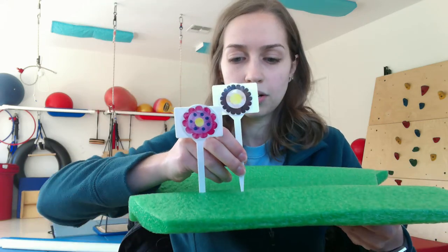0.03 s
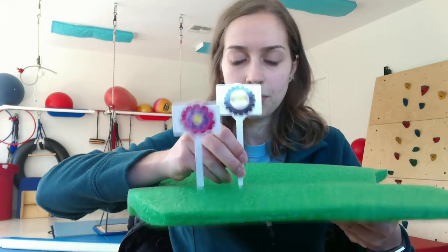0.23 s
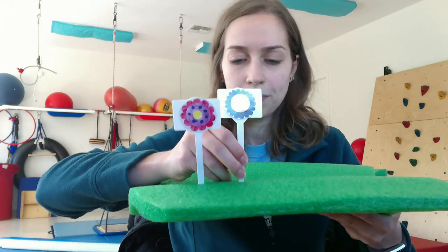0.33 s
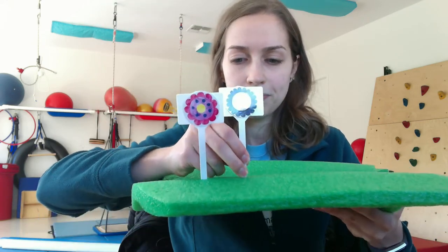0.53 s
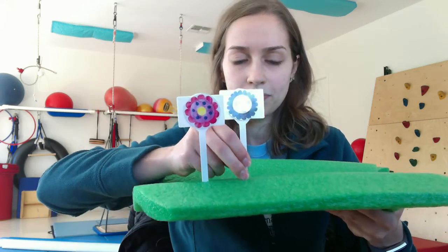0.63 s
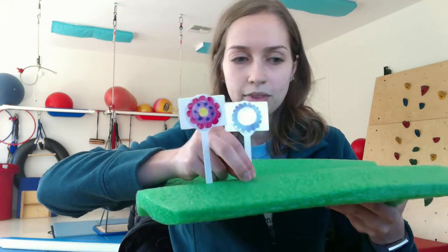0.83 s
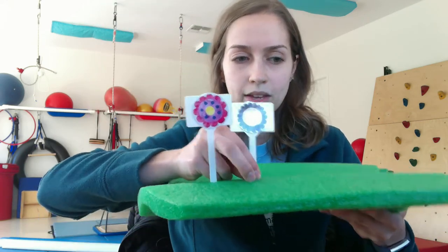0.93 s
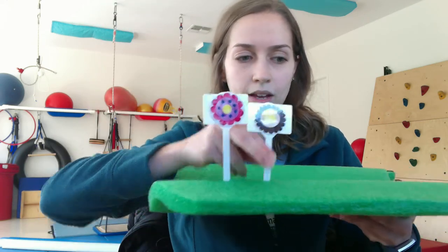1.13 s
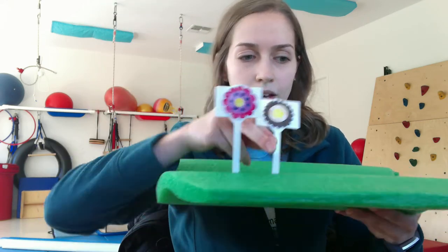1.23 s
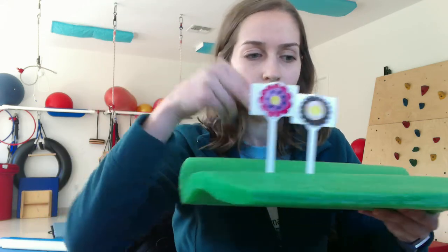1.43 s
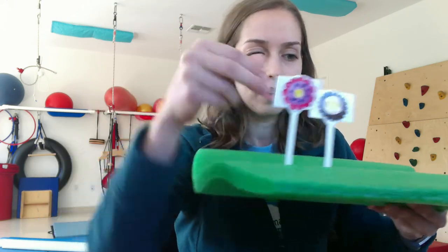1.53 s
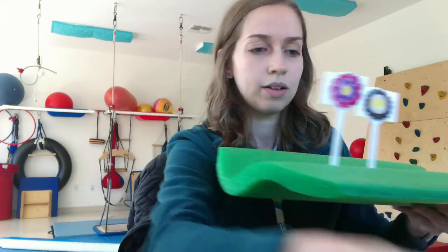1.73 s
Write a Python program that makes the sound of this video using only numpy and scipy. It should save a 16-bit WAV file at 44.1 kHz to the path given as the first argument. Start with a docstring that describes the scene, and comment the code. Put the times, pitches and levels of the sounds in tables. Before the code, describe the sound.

A plastic stem snaps into a foam pad with one loud, sharp crack in an echoing room

```python
"""A large, quiet, echoing room: a plastic stem snaps into a foam pad held close to the microphones.
One loud crack, a noise burst over ringing modes, sets off reflections and a hall tail.
A soft knock on the pad's modes, small ticks of filtered noise, a rustle of fingers on foam made of
random grains and a faint tone join it, over shaped-noise hiss and rumble and a wavering mains hum."""
import sys
import numpy as np
from scipy import signal
from scipy.fft import irfft
from scipy.io import wavfile
from scipy.ndimage import uniform_filter1d

SR = 44100
rng = np.random.default_rng(int(sys.argv[2]) if len(sys.argv) > 2 else 0)


def natural_amplitude(level_db):
    """Convert a level in decibels to a linear amplitude factor, elementwise."""
    exponent = np.asarray(level_db, float) / 20
    return 10 ** exponent


def unload_wav(signal):
    """Save mono or channel-first audio to the path in sys.argv[1] as 16-bit WAV at rate SR, clipped to [-1, 1]."""
    wavfile.write(
        sys.argv[1],
        SR,
        np.round(np.clip(np.atleast_2d(signal).T, -1, 1) * 32767).astype(np.int16),
    )


N = 79380


def evened(x):
    """Scales to an rms of 1."""
    return x / np.sqrt(np.mean(x ** 2) + 1e-20)


def read(points, hz, column=1):
    """Interpolates a table column over log frequency."""
    table = np.array(points)
    return np.interp(np.log(hz + 1), np.log(table[:, 0] + 1), table[:, column])


def add(mix, start_s, sound):
    """Adds a sound in place, cut at the end of the mix."""
    part = mix[..., round(start_s * SR):][..., :sound.shape[-1]]
    part += sound[..., :part.shape[-1]]


def sides(left_right_db):
    """Left and right gains, split evenly about 0 dB."""
    return natural_amplitude(np.array([[left_right_db / 2], [-left_right_db / 2]]))


def coloured(x, points):
    """Minimum-phase filter with the given spectrum, energy 1."""
    hz = abs(np.fft.fftfreq(4096, 1 / SR))
    log_gain = np.log(natural_amplitude(np.maximum(read(points, hz), -70)))
    spectrum = np.exp(np.conj(signal.hilbert(log_gain)))
    taps = np.fft.ifft(spectrum).real[:2048]
    return signal.fftconvolve(x, (taps / np.linalg.norm(taps))[None], axes=1)


def noise_pair(size, gain=1):
    """Two-channel noise, alike in the bass as two close microphones are."""
    # Each row: frequency in Hz, left-right correlation (-1 to 1).
    likeness = [(60, 0.86), (150, 0.78), (380, 0.76), (950, 0.92), (2380, 0.53), (5980, 0.45),
                (15000, -0.1)]
    a, b, c, d = rng.standard_normal((4, size // 2 + 1))
    same = np.clip(read(likeness, np.fft.rfftfreq(size, 1 / SR)), -1, 1)
    left = a + 1j * b
    right = same * left + np.sqrt(1 - same ** 2) * (c + 1j * d)
    return evened(irfft(np.array([left, right]) * gain, size))


def burst(t60_s):
    """Noise under an exponential decay."""
    return noise_pair(size=4096) * natural_amplitude(-60 * np.arange(4096) / SR / t60_s)


def snap(t60_s):
    """One click followed by a decaying scatter of noise."""
    out = burst(t60_s)
    out[:, 0] = natural_amplitude(12)  # dB over the scatter's initial rms
    return out


def ring(hz, db, t60_s, rise_s):
    """One mode: a decaying sine with a soft start."""
    t = np.arange(SR // 2) / SR
    return natural_amplitude(db - 60 * t / t60_s) * (1 - np.exp(-t / rise_s)) * np.sin(2 * np.pi * hz * t)


def echoed(x, late_db):
    """The sound itself and a few smeared echoes off near surfaces."""
    # Each row: delay in seconds, level in dB (late_db is added past 5 ms), smear T60 in seconds.
    echoes = [(.002, -7, .004), (.0035, -11, .008), (.0105, -11, .04), (.0372, -17, .02)]
    taps = np.zeros((2, 8192))
    taps[:, 0] = 1
    for delay_s, db, t60_s in echoes:
        smear = burst(t60_s)
        smear = smear / np.linalg.norm(smear, axis=1, keepdims=True)
        add(taps, delay_s, natural_amplitude(db + late_db * (delay_s > .005)) * smear)
    return signal.fftconvolve(x, taps, axes=1)[:, :N]


def room(x, near_db, hall_db):
    """A quick cluster of reflections, then the long tail dying band by band."""
    # Each row: frequency in Hz, T60 in seconds, relative level in dB.
    hall_bands = [(50, 1.6, 1), (80, 1.0, 3.5), (160, 0.36, 3.5), (257, 0.77, 3.5), (390, 0.83, -4.5),
                  (600, 0.93, 0.5), (1224, 0.88, 3.5), (2496, 1.1, -3.5), (4070, 1.046, -0.5),
                  (5500, .9, -3.5), (7000, 0.7, 3.5), (8920, .6, 0.5), (12000, 0.6, -6.5),
                  (16000, 0.49, -2.5)]
    near_t60_s, near_start_s, hall_rise_s = 0.18, 0.0013, 0.01
    t = np.arange(SR) / SR
    near = noise_pair(SR) * natural_amplitude(-60 * t / near_t60_s) * (t > near_start_s)
    hz, frame_s, z = signal.stft(noise_pair(SR), SR, nperseg=1024, noverlap=768)
    band_db = read(hall_bands, hz, column=2)[:, None]
    band_t60_s = read(hall_bands, hz)[:, None]
    z = z * natural_amplitude(band_db - 60 * frame_s / band_t60_s)
    hall = signal.istft(z, SR, nperseg=1024, noverlap=768)[1][:, :SR]
    hall = hall * (1 - np.exp(-t / hall_rise_s))
    taps = natural_amplitude(near_db) * near / np.linalg.norm(near[0]) + natural_amplitude(hall_db) * hall / np.linalg.norm(hall[0])
    return signal.fftconvolve(x, taps, axes=1)[:, :N]


def background():
    """Rumble and hiss as shaped noise, and a mains hum whose level wavers at random."""
    # Each row: frequency in Hz, relative level in dB per Hz.
    floor_colour = [(12, -0.5), (22, -1), (33, -7), (50, -7.5), (80, -19.5), (130, -20), (170, -28.5),
                    (280, -25.5), (490, -32.5), (800, -36.5), (1400, -41), (3000, -45.5), (7500, -46.5),
                    (12000, -44), (15000, -44), (16500, -49.5)]
    # Each row: frequency in Hz, left over right in dB.
    floor_balance = [(60, -2.5), (240, 0), (950, -0.5), (3770, 2), (15000, -1.5)]
    floor_db, hum_hz, hum_rms_db, waver_rms = -47, 118.3, -56.5, 0.067
    hz, t = np.fft.rfftfreq(N, 1 / SR), np.arange(N) / SR
    side_db = np.outer([.5, -.5], read(floor_balance, hz))
    floor = noise_pair(N, natural_amplitude(read(floor_colour, hz) + side_db))
    waver = evened(uniform_filter1d(rng.standard_normal(N), 3000))
    hum = np.sqrt(2) * (1 + waver_rms * waver) * np.sin(2 * np.pi * hum_hz * t)
    return natural_amplitude(floor_db) * floor + natural_amplitude(hum_rms_db) * hum


def ticks():
    """Plastic on foam: bright click, middle snap, duller tap; returns the ticks and what drives the room."""
    # Each row: start in seconds, treble, middle and body levels in dB, left over right in dB,
    # T60 in seconds.
    tick_rows = [(.189, -53.5, -80, -71, 1, 0.0034), (.2077, -50, -72, -67, 7, 0.0045),
                 (.465, -44, -47, -76, 3, 0.0041), (0.674, -40.5, -41.5, -39.5, 10.5, 0.016),
                 (.783, -48.5, -73, -75, 16, 0.0033), (0.7888, -46, -70, -48, 11, .005),
                 (0.796, -79, -68, -37, 6, 0.0047), (0.799, -40, -61, -47, 14, 0.0047),
                 (0.8015, -30, -34, -31, 9, 0.018), (0.9176, -48.5, -64, -59, 9, 0.0034),
                 (1.017, -54, -72, -69.5, 10, 0.0074), (1.1075, -51.5, -71, -78, 0, 0.0045),
                 (1.3184, -34, -46, -58, 15.5, 0.0057), (1.4973, -24, -30, -48, 11, 0.005)]
    # Spectra of the three layers. Each row: frequency in Hz, relative level in dB per Hz.
    treble_colour = [(4500, -36), (6500, -19.5), (8200, -1.5), (9500, 0), (11000, -3), (13000, -6),
                     (16500, -9)]
    middle_colour = [(1200, -32), (2200, -8.5), (3200, -3), (4500, -6.5), (6000, -5.5), (8000, -1.5),
                     (11000, -18)]
    body_colour = [(200, -21.5), (600, -12), (1100, -4.5), (1550, 0), (2100, -13), (3500, -37)]
    direct, impulses = np.zeros((2, 3, 2, N))
    for start_s, *levels_db, left_right_db, t60_s in tick_rows:
        for k, db in enumerate(levels_db):
            add(direct[k], start_s, natural_amplitude(db) * sides(left_right_db) * snap(t60_s))
            add(impulses[k], start_s, natural_amplitude(db) * np.ones((1, 1)))
    colours = treble_colour, middle_colour, body_colour

    def joined(layers):
        return sum(coloured(x, colour)[:, :N] for x, colour in zip(layers, colours))

    return joined(direct), joined(impulses)


def crack():
    """The stem snaps through: a wide burst and the ring of stem and pad; the room answers the snap."""
    # Each row: frequency in Hz, relative level in dB per Hz.
    crack_colour = [(40, -2.5), (80, -2.5), (160, -13), (260, 0), (380, -3.5), (520, 3.5), (750, -3),
                    (1050, -5.5), (1500, 0.5), (2100, -2.5), (2800, 0), (4200, 1), (5200, 2), (6500, -6),
                    (8000, -9), (12000, -7.5), (15500, -9.5), (17000, -29.5)]
    # Each row: frequency in Hz, relative level in dB, T60 in seconds.
    crack_modes = [(56, -9.5, 0.35), (78, -0.5, 0.12), (256, -5, 0.13), (518, -1.5, .11), (606, -4.5, 0.16),
                   (1348, -3.5, .07), (1859, 0, 0.082), (2780, -12, 0.052)]
    start_s, t60_s, left_right_db = .2436, 0.013, 5.5
    snap_db, ring_db = -7, -25
    direct, click, rung = np.zeros((3, 2, N))
    add(direct, start_s, natural_amplitude(snap_db) * sides(left_right_db) * coloured(snap(t60_s), crack_colour))
    add(click, start_s, natural_amplitude(snap_db) * coloured(np.ones((1, 1)), crack_colour))
    modes = sum(ring(*mode, rise_s=.003) for mode in crack_modes)
    add(rung, start_s, natural_amplitude(ring_db) * sides(left_right_db) * modes)
    return echoed(direct, late_db=0) + rung + room(click, near_db=15.5, hall_db=11)


def knocks():
    """The pad thumps on its modes, with a dull thud of noise; returns both."""
    # Each row: start in seconds, low-mode, upper-mode and thud levels in dB.
    knock_rows = [(0.249, -23, -20, -33), (0.8061, -23.5, -22.5, -40), (1.03, -40.5, -43, -48)]
    # Each row: frequency in Hz, relative level in dB, T60 in seconds.
    pad_modes = [(99.6, 0.5, 0.15), (73, -15.5, .09), (226.6, -15.5, 0.195), (268, -26, 0.33),
                 (514, -20.5, .08), (1594, -5, 0.047)]
    # Each row: frequency in Hz, relative level in dB per Hz.
    thud_colour = [(100, -14), (200, -1), (300, 0), (500, -4), (900, -15), (1500, -22), (2500, -30),
                   (5000, -48)]
    rung, thuds = np.zeros((2, 2, N))
    for start_s, low_db, upper_db, thud_db in knock_rows:
        modes = [ring(hz, db + (upper_db if hz > 150 else low_db), t60_s, rise_s=0.01)
                 for hz, db, t60_s in pad_modes]
        add(rung, start_s, -sum(modes)[None])  # first swing negative
        add(thuds, start_s, natural_amplitude(thud_db) * coloured(burst(t60_s=0.072), thud_colour))
    return rung, thuds


def rustle():
    """Fingers drag over foam cells: many tiny grains at random times and sizes."""
    # Each row: time in seconds, level in dB.
    rustle_level = [(0.659, -65), (.68, -44.5), (.71, -68), (.78, -63), (0.812, -39.5), (.84, -52),
                    (.86, -56), (.9, -65), (1.01, -64.5), (1.025, -57), (1.06, -65), (1.16, -66),
                    (1.174, -49), (1.196, -69), (1.26, -60), (1.3, -75), (1.5, -116), (1.601, -70),
                    (1.699, -86.5)]
    # Each row: frequency in Hz, relative level in dB per Hz.
    rustle_colour = [(880, -56.5), (1500, -5), (3890, -9.5), (4260, -11), (4660, -9.5), (9790, -12),
                     (14600, -3.5), (16500, -18)]
    grains_per_s, spread_db = 5000, 1.5
    size_db = spread_db * np.minimum(rng.exponential(1, (2, N)), 5)
    size = natural_amplitude(size_db) * rng.standard_normal((2, N))
    grains = evened(size * (rng.random(N) < grains_per_s / SR))
    time_s, db = np.transpose(rustle_level)
    level = natural_amplitude(np.interp(np.arange(N) / SR, time_s, db, -99, -99))
    return coloured(grains * level, rustle_colour)[:, :N]


def faint_tones():
    """Faint short tones: decaying sines."""
    # Each row: start in seconds, frequency in Hz, level in dB, T60 in seconds.
    tone_rows = [(1.247, 463, -50, .22)]
    tones = np.zeros((2, N))
    for start_s, hz, db, t60_s in tone_rows:
        add(tones, start_s, ring(hz, db, t60_s, rise_s=0.0073)[None])
    return tones


def scene():
    """Sums direct sounds, near echoes, room answers and background."""
    tick_direct, tick_drive = ticks()
    rung, thuds = knocks()
    soft = thuds + faint_tones() + rustle()
    wet = room(tick_drive, near_db=7, hall_db=3.5) + room(soft, near_db=-10.5, hall_db=-6)
    return crack() + echoed(tick_direct, late_db=-7) + rung + soft + wet + background()


def band_limit(x):
    """A steep low-pass at the top of the band."""
    return signal.sosfilt(signal.butter(12, 16860, fs=SR, output="sos"), x)


def record(dry):
    """The right port hears a little later; then band limit and full-scale clip."""
    right_lag_samples, edge_hz = 3, 16600
    late = np.array([dry[0], np.roll(dry[1], right_lag_samples)])
    low_pass = signal.firwin(255, edge_hz, window=("kaiser", 8), fs=SR)
    cut = signal.oaconvolve(late, low_pass[None], "same")
    return band_limit(np.clip(cut, -1, 1))


dry = scene()
out = record(dry)
unload_wav(out)
```